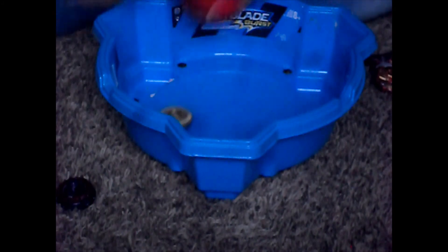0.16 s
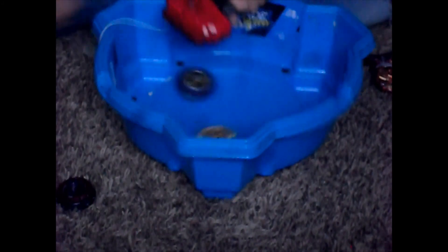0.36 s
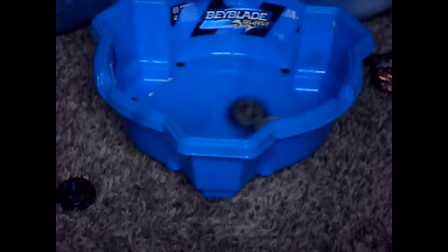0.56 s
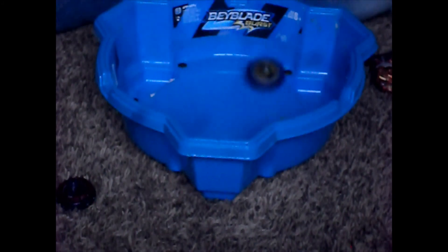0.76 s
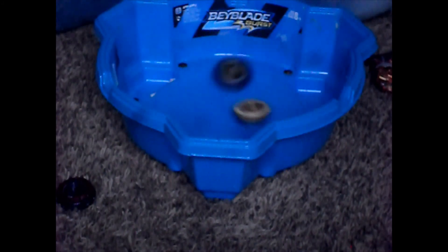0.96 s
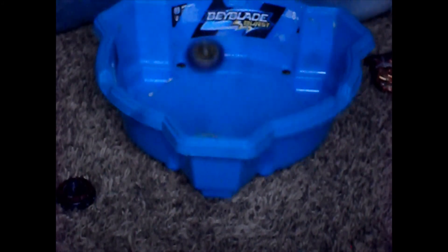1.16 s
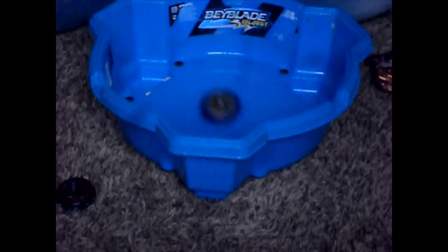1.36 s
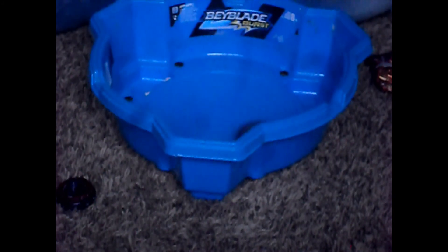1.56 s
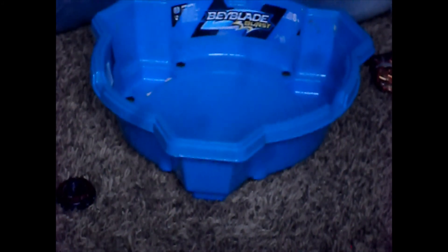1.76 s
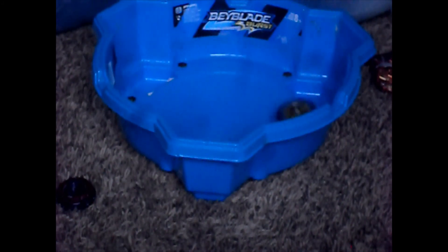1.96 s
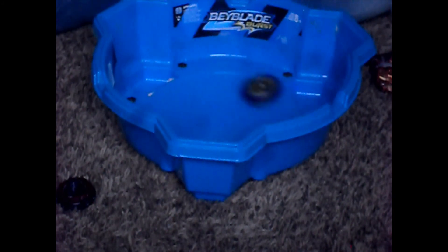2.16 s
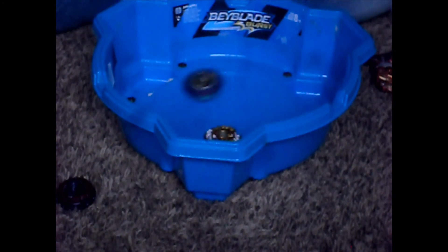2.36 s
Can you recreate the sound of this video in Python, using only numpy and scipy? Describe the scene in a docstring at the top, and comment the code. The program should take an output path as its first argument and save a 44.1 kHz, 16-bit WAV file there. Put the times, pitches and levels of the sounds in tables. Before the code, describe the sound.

A ripcord launcher zips, then two spinning tops crack together, skid along the rim and rattle a hollow plastic bowl with soft low thuds; small quiet room, one nearby microphone, slightly dulled treble.

```python
"""A small carpeted room with its air noise; one toy top already circles, humming faintly, in a thin plastic bowl.
A ripcord launcher then rasps and drops in a second top: gear clicks over a whirr drive the housing's resonances.
The tops knock, skid along the rim and clash until the end: grit rings the bowl hollowly and the discs brightly.
From the first knocks after the launch the whole bowl also thuds on the carpet, as low fading sines.
One microphone, the direct sound above a short room tail; peaks are rounded and the treble is cut."""
import sys
import numpy as np
from scipy import signal
from scipy.fft import rfft, irfft
from scipy.io import wavfile
from scipy.ndimage import uniform_filter1d

SR = 44100
rng = np.random.default_rng(int(sys.argv[2]) if len(sys.argv) > 2 else 0)


def generate_wav(sig):
    """Save sig (samples, or channels by samples) to the path in sys.argv[1] as 16-bit PCM at SR."""
    pcm = np.round(np.clip(np.atleast_2d(sig).T, -1, 1) * 32767).astype(np.int16)
    wavfile.write(sys.argv[1], SR, pcm)


N = 105840  # samples, 2.4 s
TIME = np.arange(N) / SR
SPLIT_HZ = 5500  # between the low and high resonances of discs and housing


def undb(db):
    """Decibels to amplitude gain."""
    return 10 ** (np.asarray(db, float) / 20)


def unit(x):
    """Scale to rms 1."""
    return x / np.sqrt(np.mean(x ** 2))


def curve(rows, column=1):
    """Gain over time from a dB column; silent outside it, unless it starts within the first 10 ms."""
    rows = np.array(rows, float)
    before = rows[0, column] if rows[0, 0] < .01 else -120
    return undb(np.interp(TIME, rows[:, 0], rows[:, column], left=before, right=-120))


def walk(rate):
    """Slow random wobble, spread 1: noise averaged twice over 1/rate seconds."""
    span = int(SR / rate)
    once = uniform_filter1d(rng.standard_normal(N), span)
    return unit(uniform_filter1d(once, span))


def grit(per_s):
    """Dense clicks of random sign and uneven size, rms 1."""
    chance, sign, size = rng.random((3, N))
    size_db = -2.2 * np.log(1 - size)  # exponential spread, mean 2.2 dB
    return unit((chance < per_s / SR) * np.sign(sign - .5) * undb(size_db))


def body(x, resonances, wander_db):
    """Sum of two-pole resonances, noise keeps its level; each is driven more or less as the contact moves."""
    click = np.r_[1., np.zeros(8191)]
    out, response = 0, 0
    for hz, width, db in resonances:
        b, a = signal.iirpeak(hz, hz / width, fs=SR)
        drive = x * undb(wander_db * walk(22.8))
        out = out + undb(db) * signal.lfilter(b, a, drive)
        response = response + undb(db) * signal.lfilter(b, a, click)
    return out / np.linalg.norm(response)


def below(resonances, hz):
    """Resonances lower than hz."""
    return [mode for mode in resonances if mode[0] < hz]


def above(resonances, hz):
    """Resonances higher than hz."""
    return [mode for mode in resonances if mode[0] > hz]


def soft(x, hz, kind):
    """Gentle second-order low or high cut."""
    return signal.sosfilt(signal.butter(2, hz, kind, fs=SR, output="sos"), x)


# spectrum of the quiet room: (frequency [Hz], relative density [dB per Hz])
AIR_SPECTRUM = [(15, -46), (30, 1), (60, -12), (108, -8), (170, -10), (260, -17.5), (700, -41), (2500, -57),
                (10000, -36.5)]


def air():
    """Steady room rumble and hiss: noise shaped by the spectrum, at -45.5 dB rms."""
    hz = np.maximum(np.fft.rfftfreq(N, 1 / SR), 1)
    rows = np.array(AIR_SPECTRUM)
    shape = undb(np.interp(np.log(hz), np.log(rows[:, 0]), rows[:, 1]))
    noise = irfft(rfft(rng.standard_normal(N)) * shape, N)
    return unit(noise) * undb(-45.5)


def hum():
    """The first top hums faintly, a sine falling in pitch, until the launch."""
    start_hz, sag_hz_per_s, end_s = 810, 600, 0.16
    hz = (start_hz - sag_hz_per_s * np.minimum(TIME, end_s)) * (1 + 0.011 * walk(60))
    fade = np.clip((end_s - TIME) / 0.035, 0, 1)
    level = undb(-45 + 3 * walk(45))
    return np.sin(2 * np.pi * np.cumsum(hz) / SR) * fade * level


# tips grinding on the bowl floor: (time [s], hiss level [dB], bowl rumble level [dB])
ROLLING = [(0, -46, -46.5), (.1, -49.5, -44.5), (.2, -38.5, -41.5), (.4, -39.5, -41.5), (.46, -35.5, -36.5),
           (.53, -32.5, -40.5), (.6, -27.5, -33), (.7, -34.5, -41.5), (.83, -45, -47.5), (.92, -39, -36.5),
           (1.07, -50, -54), (1.13, -39, -55), (1.185, -42.5, -40.5), (1.26, -40.5, -44), (1.44, -53, -29),
           (1.56, -35, -27), (1.75, -29.5, -22), (1.89, -37, -29.5), (2.08, -28, -28.5), (2.17, -44, -35),
           (2.28, -43, -40), (2.4, -40, -38.5)]


def rolling():
    """Flickering grit strength of the grinding tips, for disc tick, disc ring, bowl clack and bowl boom."""
    hiss, rumble = curve(ROLLING), curve(ROLLING, column=2)
    levels = np.array([hiss, undb(-2.5) * hiss, rumble, undb(-7.5) * rumble])
    return levels * undb(2.74 * walk(33))


# knocks and skids on the bowl, levels before the trims in knocks():
# (time [s], tick level [dB], ring level [dB], bowl clack level [dB], bowl boom level [dB], chatter fade [s])
KNOCKS = [(0.0197, -15.5, -36, -25, -66, 0.0037), (0.3844, -23, -25.5, -25, -25.5, 0.025),
          (0.546, -25, -25, -31.5, -61, 0.066), (0.6216, -4.5, -23, -49, -55, 0.012),
          (0.6772, -20, -26, -19, -32.5, 0.026), (0.734, -23, -33, -50, -40.5, 0.024),
          (0.8366, -67, -32, -24.5, -30, 0.011), (0.849, -18, -28, -25.5, -35.5, 0.026),
          (0.951, -22, -32.5, -37, -30.5, 0.018), (1.091, -15.5, -33, -36, -64, 0.018),
          (1.124, -17, -31, -23, -34, 0.011), (1.1928, -18.5, -23.5, -16, -25, 0.025),
          (1.2423, -42, -24, -21.5, -30, 0.017), (1.287, -28, -22.5, -20, -31.5, 0.029),
          (1.3216, -19, -28, -8.5, -26.5, 0.015), (1.3684, -28, -28.5, -22, -37, 0.067),
          (1.398, -40, -22, -8.5, -41, 0.0043), (1.468, -24, -30.5, -20, -30.5, 0.053),
          (1.503, -17, -21.5, -17, -25.5, 0.021), (1.5937, -16, -25, -32, -50, 0.011),
          (1.6132, -13, -19, -12.5, -47, 0.023), (1.677, -10.5, -25.5, -19, -43, 0.015),
          (1.7, -32, -34, -11, -27, 0.023), (1.7326, -15.5, -18.5, -32, -19, 0.011),
          (1.7783, -30, -19, -21, -18, 0.0052), (1.8163, -17, -20, -11.5, -27, 0.024),
          (1.8494, -35, -20, -33, -12, 0.0044), (1.917, -25, -24.5, -43, -26, 0.032),
          (1.943, -27, -39, -18, -39, 0.025), (1.9727, -14.5, -25, -13.5, -23, 0.017),
          (1.996, -14.5, -23.5, -24, -45, 0.018), (2.0443, -12.5, -33, -21, -30, 0.028),
          (2.067, -16.5, -20.5, -15, -23, 0.013), (2.1862, -36, -42, -19.5, -28, 0.011),
          (2.232, -46, -31.5, -50, -31, 0.01)]


def knocks():
    """Power of the fading chatter bursts, for disc tick, disc ring, bowl clack and bowl boom."""
    rise_s = np.array([[0.0011], [0.0011], [0.0033], [0.0033]])  # the bowl answers slower than the discs
    trims_db = np.array([-7.5, -1.5, -2, 4])
    power = np.zeros((4, N))
    for start, *levels_db, fade_s in KNOCKS:
        age = np.maximum(TIME - start, 0)
        gains = undb(levels_db + trims_db)[:, None]
        power += (gains * (1 - np.exp(-age / rise_s)) * np.exp(-age / fade_s)) ** 2
    return power


# sharp disc-on-disc clashes, levels before the trims in clashes():
# (time [s], tick level [dB], ring level [dB])
CLASHES_AT = [(.6055, 3, -10), (0.611, 2, -38), (.619, 0, -45), (0.9516, -15, -30.5), (1.0773, 6, -19.5),
              (1.0855, -14, -28), (2.2715, -37, -36), (2.285, -42, -28.5), (2.302, -42, -29.5),
              (2.312, -22, -25.5), (2.3416, -39, -29.5), (2.3718, -14.5, -20.5), (2.3812, -19, -31)]


def clashes():
    """Short cracks of random-sign noise that drive only the discs' tick and ring."""
    fade_s, tick_trim_db, ring_trim_db = 0.0013, -3.5, 4
    rattle = rng.choice([-1., 1.], size=N)
    force = np.zeros((2, N))
    for start, tick_db, ring_db in CLASHES_AT:
        crack = (TIME > start) * np.exp(-np.abs(TIME - start) / fade_s) * rattle
        force += undb([[tick_db + tick_trim_db], [ring_db + ring_trim_db]]) * crack
    return force


# a top's disc, ring below SPLIT_HZ and tick above: (frequency [Hz], width [Hz], relative level [dB])
DISC_RESONANCES = [(2930, 1070, 5.5), (3535, 1400, 13), (4030, 4900, -1.5), (5230, 460, 3),
                   (6980, 1450, 14), (8270, 1450, 17.5), (9290, 540, 20)]


def discs(tick_force, ring_force):
    """The hard discs tick and ring brightly through their resonances."""
    tick = body(tick_force, above(DISC_RESONANCES, SPLIT_HZ), wander_db=2.0)
    ring = body(ring_force, below(DISC_RESONANCES, SPLIT_HZ), wander_db=1.6)
    return soft(tick + ring, 1040, "high")


# the thin plastic bowl: (frequency [Hz], width [Hz], relative level [dB])
BOWL_RESONANCES = [(314.3, 36, 2.5), (376.2, 36, 5), (420.6, 43, 3), (482, 17.7, 4), (699.4, 19, 8.5),
                   (742, 90, 0.5), (803, 62, 2.5), (862, 71, -2), (1008, 106, -6), (1202, 310, 0),
                   (1664, 290, -2)]


def bowl(clack_force, boom_force):
    """The bowl booms hollowly through its resonances below 600 Hz and clacks through those above."""
    clack = body(clack_force, above(BOWL_RESONANCES, 600), wander_db=2)
    boom = body(boom_force, below(BOWL_RESONANCES, 600), wander_db=2)
    clack = soft(soft(clack, 700, "high"), 1950, "low")
    boom = soft(soft(boom, 1220, "low"), 220, "high")
    return clack + boom


def tops():
    """Rolling and knocks add in power as grit, clashes add their cracks; all ring discs and bowl."""
    strength = np.sqrt(knocks() + rolling() ** 2)
    force = strength * [grit(15000) for _ in strength]
    force[:2] += clashes()
    tick, ring, clack, boom = force
    return discs(tick, ring) + bowl(clack, boom)


# pull of the ripcord: (time [s], level of the low resonances [dB], level of the high ones [dB])
RIPCORD_PULL = [(.198, -32, -51), (.224, -13, -14.5), (.24, -14.5, -15.5), (.28, -20.5, -20),
                (.315, -18.5, -13), (.35, -26, -22), (.385, -38, -47)]
# launcher housing: (frequency [Hz], width [Hz], relative level [dB])
HOUSING_RESONANCES = [(1245, 29, 0.5), (1697, 76, 3.5), (2060, 260, -1.5), (2510, 115, 4.5), (2737, 38, 9),
                      (3290, 430, 6), (3606, 70, 3), (4140, 270, -11), (5720, 2700, -0.5),
                      (6670, 1400, -4.5), (8470, 540, 2)]


def launcher():
    """Rack teeth rattle the gear unevenly over a whirr of slipping plastic; the housing resonates."""
    teeth_hz, jitter, share = 263, 0.29, 0.2  # share: part of the strength that follows the teeth
    phase = np.cumsum(teeth_hz * (1 + jitter * walk(300)) / SR) % 1
    teeth = unit(np.exp(-phase / .3))
    drive = unit(grit(14000) * (1 - share + share * teeth))
    low_drive = drive * curve(RIPCORD_PULL)
    high_drive = drive * curve(RIPCORD_PULL, column=2)
    low = body(low_drive, below(HOUSING_RESONANCES, SPLIT_HZ), wander_db=3.5)
    high = body(high_drive, above(HOUSING_RESONANCES, SPLIT_HZ), wander_db=1.6)
    return soft(low + high, 1000, "high")


# the whole bowl bouncing on the carpet: (time [s], level [dB])
BOWL_BOUNCES = [(0.387, -30.5), (.58, -32), (1.399, -31), (1.53, -29.5), (1.736, -27), (1.801, -26.5),
                (1.914, -33), (1.982, -33)]


def thuds():
    """Soft low bounces: fading sines, each at a slightly different pitch."""
    centre_hz, rise_s, fade_s = 103.5, 0.0027, 0.023
    out = np.zeros(N)
    for start, db in BOWL_BOUNCES:
        age = np.maximum(TIME - start, 0)
        shape = (1 - np.exp(-age / rise_s)) * np.exp(-age / fade_s)
        hz = centre_hz * (1 + 0.033 * rng.standard_normal())
        out += undb(db) * shape * np.sin(2 * np.pi * hz * age)
    return out


def room(x):
    """The small room's diffuse tail, 7 dB down: noise decaying after a brief gap."""
    t60_s, gap_s = .2, .004
    t = np.arange(SR // 2) / SR
    tail = rng.standard_normal(len(t)) * undb(-60 * t / t60_s) * (t > gap_s)
    return x + undb(-7) * signal.fftconvolve(x, tail / np.linalg.norm(tail))[:N]


def scene():
    """Everything that sounds in the room, over its air; one channel."""
    sources = hum() + tops() + launcher() + thuds()
    return (room(sources) + air())[None]


def record(dry):
    """The microphone's camera rounds the peaks, rolls off the treble and cuts the top."""
    ceiling = .85
    rounded = np.tanh(dry / ceiling) * ceiling
    rolled = signal.sosfilt(signal.butter(6, 10300, fs=SR, output="sos"), rounded)
    return signal.sosfilt(signal.ellip(10, .5, 60, 10850, fs=SR, output="sos"), rolled)


dry = scene()
out = record(dry)
generate_wav(out)
```